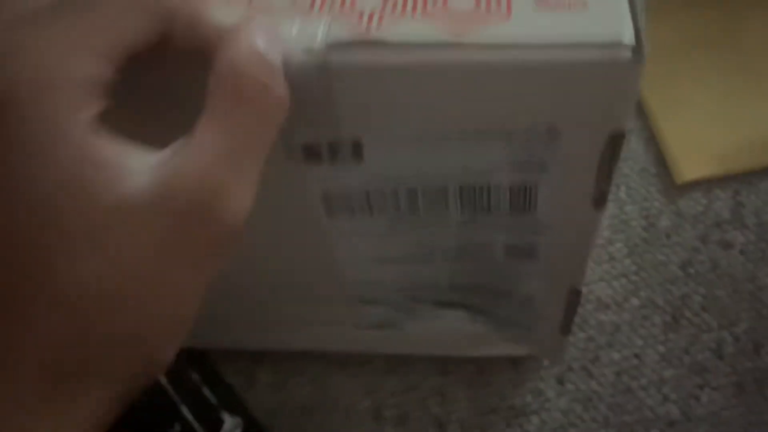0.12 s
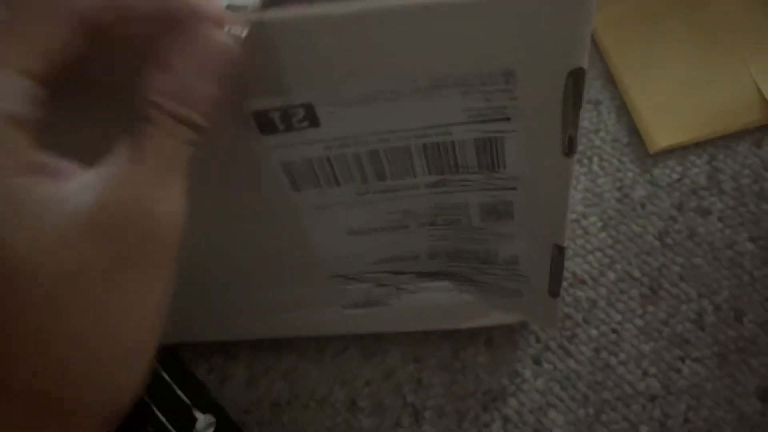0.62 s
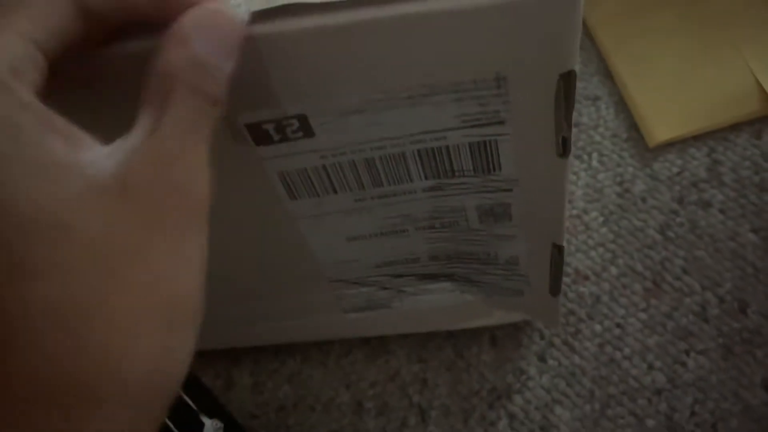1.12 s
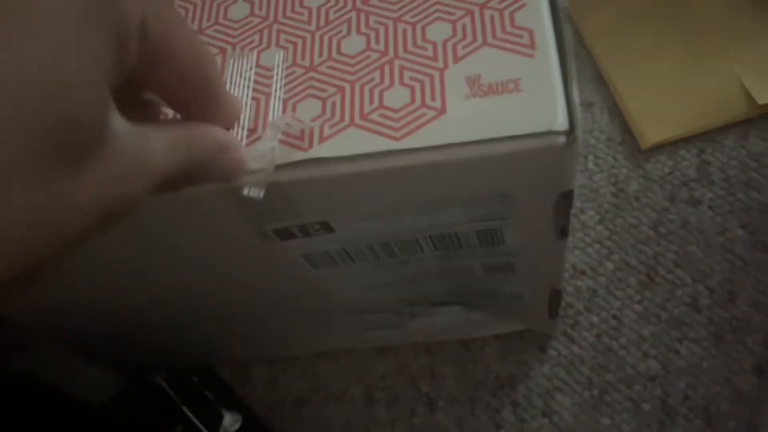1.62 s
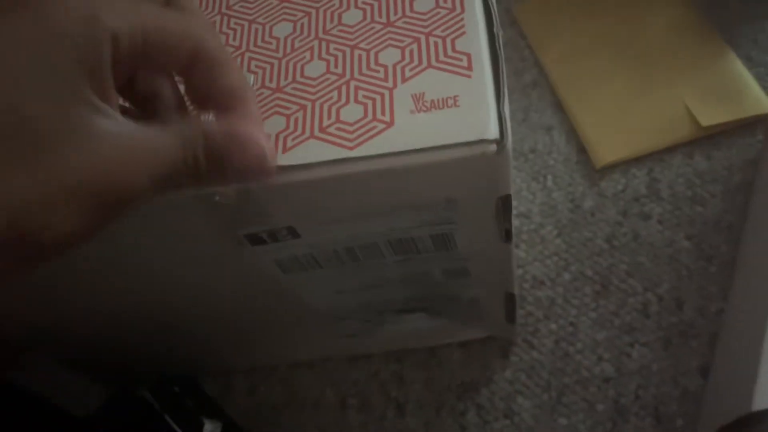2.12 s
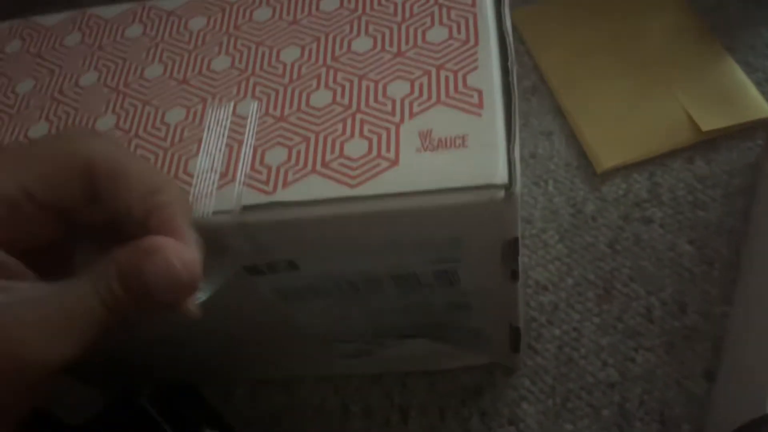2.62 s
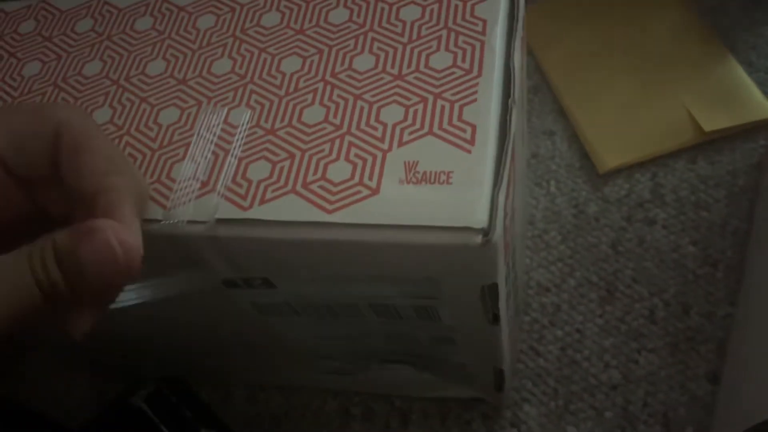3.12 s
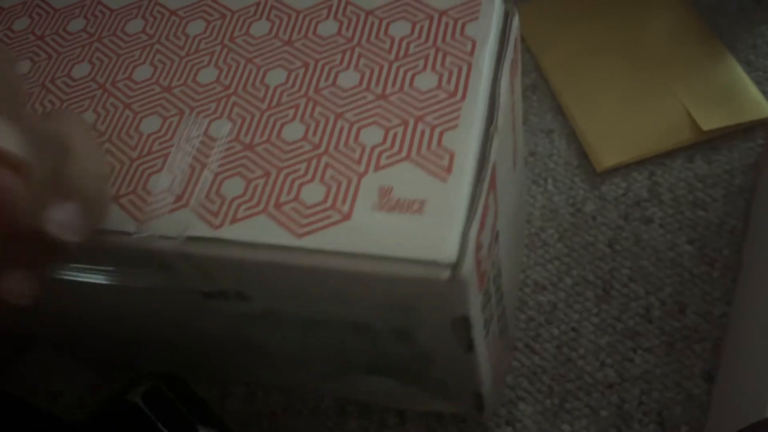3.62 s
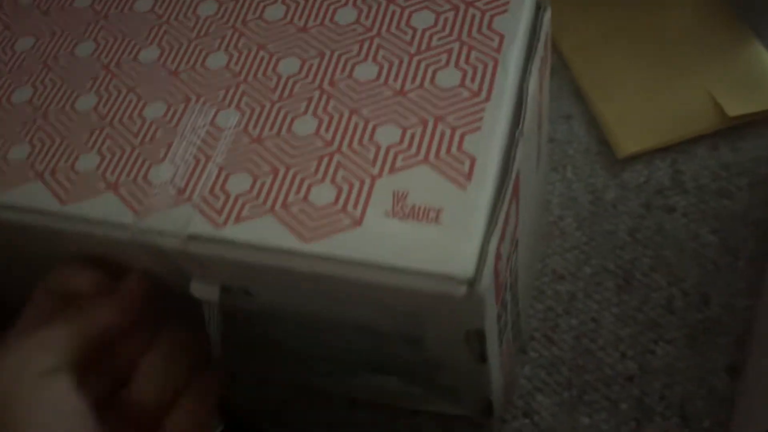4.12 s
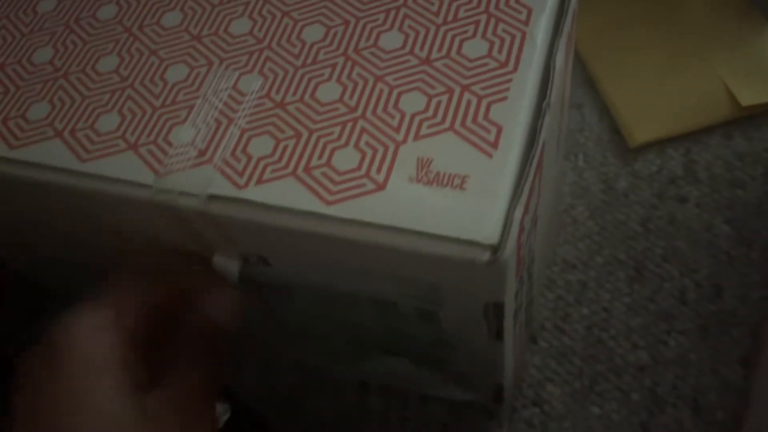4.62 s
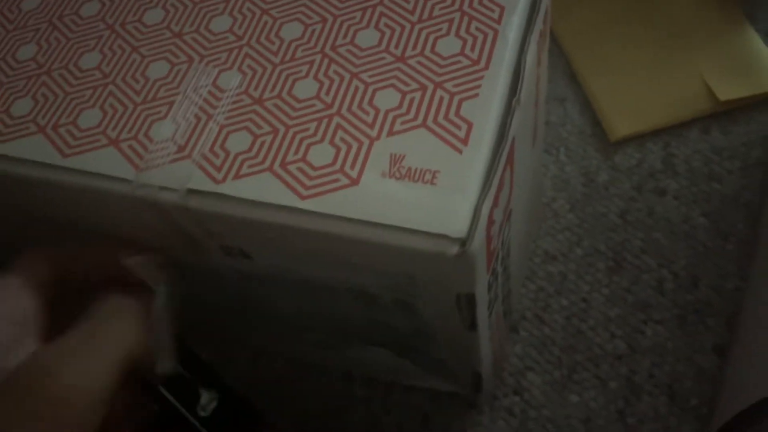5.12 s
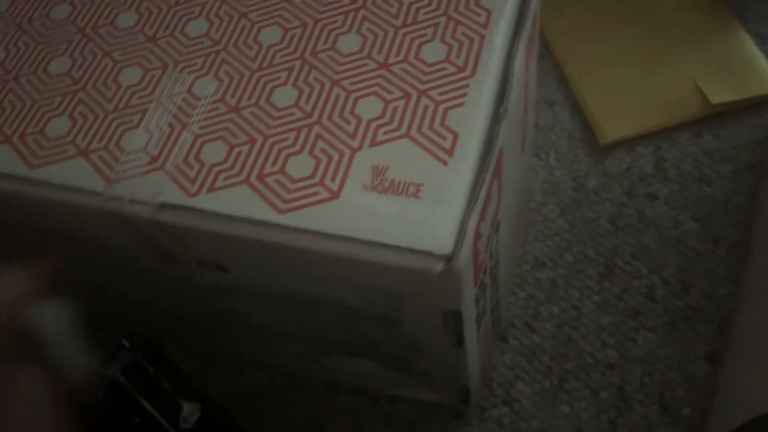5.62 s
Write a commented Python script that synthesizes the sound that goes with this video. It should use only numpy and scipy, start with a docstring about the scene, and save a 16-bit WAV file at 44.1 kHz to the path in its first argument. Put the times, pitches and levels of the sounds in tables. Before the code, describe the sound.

Fingers handle a hollow cardboard box on carpet, very close. It opens with a dull push and thump, then light taps, two stronger hollow knocks, and sharp tape snaps from two seconds. Around four seconds a loud scraping, ripping jolt runs into rapid crackling clicks, then one last bump before it quiets. Small dry carpeted room, close stereo microphone, box slightly left.

```python
"""Hollow knocks and sharp tape snaps: hands shift a cardboard box on a carpet and pick at its packing tape.
Knocks ring decaying panel modes; snaps are bursts of random-sign noise with one crack inside.
Dense noise grains, shaped by each gesture, make the box creak and skin, nail and tape rub; sparse ticks join.
A short soft room tail and still air lie behind it, all heard close up through a two-port microphone."""
import sys
import numpy as np
from scipy import signal
from scipy.fft import rfft, irfft, next_fast_len
from scipy.io import wavfile
from scipy.ndimage import uniform_filter1d, map_coordinates

SR = 44100
rng = np.random.default_rng(int(sys.argv[2]) if len(sys.argv) > 2 else 0)


def master(y):
    """Save y as 16-bit WAV."""
    cut = np.clip(np.atleast_2d(y).T, -1, 1)
    pcm = np.round(cut * 32767)  # scale
    wavfile.write(sys.argv[1], SR, pcm.astype(np.int16))


def undo_db(level):
    """Turn decibels back into plain size, where 20 dB means ten times bigger."""
    steps = np.asarray(level, float) / 20
    return 10 ** steps


N = 252693  # length in samples

# still room tone, overall level set apart: pitch_hz, level_db
AIR_COLOUR = [(18, -19), (30, 20.5), (223, -4), (849, -13), (7170, -27), (9040, -36.5), (14000, -74.5)]
# ringing box panels and the air inside: pitch_hz, level_db, t60_s
BOX_MODES = [(51, -13, 0.26), (90.5, 7, 0.061), (127, -5.5, 0.12), (150.6, -1.5, 0.04), (183, 2.5, 0.056),
             (237, -0.5, 0.059), (278.3, 2, 0.036), (329, -5.5, 0.035), (368.3, -3.5, 0.018),
             (401, 1.5, 0.017), (552, 5.5, 0.018), (731, -3.5, 0.017), (806, 5.5, 0.011), (915, 0.5, 0.013),
             (1273, -6.5, 0.015), (1370, -15.5, 0.005), (1774, -9.5, 0.0064), (2425, -9.5, 0.0053)]
# the box is pushed or squeezed: start_s (moment of the peak), peak_db, swell_s and fade_s (per 20 dB),
# creak_db (creaking hiss over the drag)
SHIFTS = [(0.0, -19.5, .01, 0.096, -11), (0.07, -34.5, 0.25, 0.054, -4.5), (0.16, -39, 0.11, 0.13, -6),
          (0.35, -47, 0.038, 0.33, -15), (0.56, -67, 1, 0.057, 4.5), (0.855, -46, 0.056, 0.33, -14.5),
          (1.26, -35, 0.05, 0.16, -14.5), (1.518, -33, 0.13, 0.079, -10), (1.69, -31.5, 0.026, 0.11, -16),
          (1.891, -49.5, 0.071, 0.037, -2), (2.118, -57, 0.32, 0.24, -1), (2.342, -45, 0.15, 0.11, -5.5),
          (2.517, -42, 0.084, 0.4, -10), (2.972, -56, 0.3, 0.75, -3.5), (3.15, -74, .3, 0.19, 4),
          (3.5, -48, 0.059, 0.25, -12.5), (3.745, -44, 0.064, 0.06, -3), (3.918, -44.5, 0.62, 0.32, -6),
          (3.976, -27.5, 0.05, 0.056, 6), (4.11, -37, 0.02, 0.12, -8.5), (4.409, -49.5, 0.28, 0.11, -0.5),
          (4.574, -40, 0.075, 0.06, -10.5), (4.82, -24.5, 0.016, 0.021, -9.5),
          (4.868, -42, 0.23, 0.15, -10.5), (5.047, -56, 0.011, 0.13, 2)]
# fingers stroke tape and board: start_s (moment of the peak), peak_db, swell_s and fade_s (per 20 dB),
# sharpness_db (nail over skin)
STROKES = [(0.0, -36, .01, 0.21, -6.5), (0.351, -59, 0.02, 0.25, -4.5), (0.779, -55, 0.0097, 0.1, -10),
           (0.857, -57, 0.061, 0.06, -1.5), (0.945, -65.5, 0.24, 0.27, -1.5), (1.238, -57, 0.02, 0.34, -4),
           (1.46, -50.5, 0.29, 0.27, -5), (1.512, -31, 0.017, 0.02, -6), (1.637, -70.5, 0.021, 0.031, 19),
           (1.69, -54, 0.14, 0.28, -7), (1.894, -55, 0.18, 0.055, -0.5), (1.962, -63.5, 0.0088, 0.88, 3),
           (2.119, -48, 0.025, 0.026, 3.5), (2.202, -61.5, 0.032, 0.27, 4), (2.337, -51.5, 0.035, 0.1, -4),
           (2.472, -44.5, 0.061, 0.089, -4), (2.64, -50.5, 0.12, 0.095, -23), (2.749, -50.5, 0.4, 0.12, -3),
           (2.972, -53, 0.2, 0.11, -3.5), (3.227, -67, 0.0022, 0.24, -2), (3.39, -72.5, 0.02, 0.32, 20.5),
           (3.595, -54, 0.21, 0.092, -10), (3.668, -65.5, 0.056, 0.46, 0), (3.715, -46, 0.033, 0.081, -4),
           (3.918, -49.5, 0.28, 0.46, -3), (3.979, -26, 0.031, 0.052, -6.5),
           (4.106, -67.5, 0.043, 0.033, 28.5), (4.15, -54.5, .2, 0.098, -1), (4.409, -55, 0.72, 0.22, 0.5),
           (4.54, -50.5, 0.021, 0.069, 1.5), (4.792, -61.5, 0.25, 0.058, 4.5),
           (4.823, -48, 0.018, 0.015, 17.5), (4.838, -50, 0.074, 0.11, -5), (4.994, -64, 0.052, 0.032, 6.5),
           (5.043, -52.5, 0.013, 0.087, 0.5), (5.272, -66, 0.083, 0.31, 5), (5.559, -60, 0.034, 0.077, 5),
           (5.706, -56.5, 0.043, 0.029, -1)]
# broad rub of skin: pitch_hz, level_db
SKIN_COLOUR = [(700, -12.5), (1400, -0.5), (2000, 3.5), (3200, -3.5), (6000, -21)]
# nail and tape edge: pitch_hz, level_db
NAIL_COLOUR = [(3300, -22), (4600, -2), (6500, 0), (7500, -14), (10000, -35)]
# low creaking hiss of the rubbed box, strongest near 1.4 kHz and falling steeply above: pitch_hz, level_db
CREAK_COLOUR = [(900, 0), (1450, 8), (1800, -5)]
# fine rustle of the tape: pitch_hz, level_db
RUSTLE_COLOUR = [(5000, -6.5), (7500, 4.5), (11500, -6.5), (12800, -25), (15300, -18), (16500, -53.5)]
# rubbing from other spots, unlike at the two ports: pitch_hz, level_db
ELSEWHERE_COLOUR = [(300, -28), (800, -8), (2000, -5.5), (4000, 3.5), (8500, -7.5)]
# tape lets go: start_s (moment of the crack), level_db, body_db (relative), width_s (scales rise and fall)
SNAPS = [(0.0087, -41, 16, 0.006), (0.223, -56, 11, 0.0011), (0.3455, -35.5, 3.5, 0.0045),
         (0.553, -56.5, 9, 0.0084), (0.78, -37.5, 0.5, 0.00077), (0.952, -37, -3.5, 0.0042),
         (1.2672, -29.5, 0, 0.004), (1.358, -51, 6, 0.0044), (1.5133, -48, 4, 0.0028),
         (1.521, -46, -14, 0.002), (1.646, -31.5, -4.5, 0.012), (1.674, -45, 9, 0.0023),
         (1.682, -40.5, 6.5, 0.01), (1.7838, -54, 20, 0.00042), (2.005, -26, -2, 0.007),
         (2.016, -43.5, 11.5, 0.001), (2.0847, -31.5, -1, 0.011), (2.11, -17.5, -12, 0.0044),
         (2.2043, -34, -17, 0.0036), (2.2199, -24.5, -8, 0.0093), (2.317, -21, -10.5, 0.0015),
         (2.322, -31.5, 3, 0.0095), (2.3313, -27.5, -1.5, 0.0029), (2.4453, -21, 7, 0.0044),
         (2.4494, -3.5, -1.5, 0.0034), (2.5651, -26, -1, 0.007), (2.6396, -54, 10, 0.0045),
         (2.689, -25, -2.5, 0.0025), (2.7241, -30, -0.5, 0.0028), (2.745, -33.5, -0.5, 0.0054),
         (2.826, -36, -22, 0.00055), (2.8515, -28, -12.5, 0.0015), (2.8657, -25, -26, 0.00042),
         (2.885, -31.5, -7, 0.0029), (2.904, -30.5, -9, 0.0099), (2.9161, -24, -22, 0.0069),
         (2.959, -26, -8.5, 0.0017), (2.9667, -30, -10, 0.0042), (3.001, -51, 19.5, 0.0058),
         (3.218, -37.5, -60, 0.00085), (3.4737, -36, -5, 0.0031), (3.8649, -31, 2, 0.0074),
         (3.92, -31.5, -6.5, 0.0048), (3.9424, -31, -0.5, 0.029), (3.9615, -18.5, -4, 0.00092),
         (3.9683, -7.5, -2.5, 0.0031), (3.9776, -13.5, -6.5, 0.0011), (3.9865, -11.5, -9, 0.0049),
         (4, -19.5, -7, 0.036), (4.006, -7, -4, 0.0025), (4.165, -11.5, -5.5, 0.0014),
         (4.23, -15.5, -4, 0.0045), (4.2456, -33, -7, 0.0044), (4.2511, -12.5, -12, 0.0028),
         (4.266, -6.5, -27, 0.00098), (4.278, -19.5, -10.5, 0.0013), (4.283, -3, -28, 0.0027),
         (4.309, -34, -13, 0.0046), (4.3185, -5.5, -16, 0.0017), (4.336, -24.5, -13, 0.0023),
         (4.3566, -35.5, 2.5, 0.0092), (4.37, -13, -8, 0.006), (4.3789, -13, -8, 0.000895),
         (4.392, -16.5, -10.5, 0.0067), (4.5407, -28.5, -21, 0.0047), (4.5482, -21, -11, 0.0035),
         (4.6029, -33, -13, 0.0071), (4.697, -33.5, -7.5, 0.0041), (4.7596, -32.5, -7, 0.0028),
         (4.7999, -16.5, -8, 0.0061), (4.8088, -11, 2.5, 0.0053), (4.8214, -17, 1, 0.0073),
         (5.0979, -35, 5.5, 0.0011), (5.334, -29.5, -13.5, 0.01)]
# body of a snap: pitch_hz, level_db
SNAP_BODY_COLOUR = [(600, -28), (1500, -7), (3000, -4), (4000, -0.5), (5000, -1.5), (6500, 2),
                    (10000, -51.5)]
# bright top of a snap: pitch_hz, level_db
SNAP_TOP_COLOUR = [(3600, -16), (4900, 10), (6400, -12), (8200, 0), (11500, 1), (13500, -5), (15200, -11),
                   (17000, -34.5)]
# fingers and carpet knock the box: start_s, peak_db, panel_hz (panel struck), hardness_db (before an offset)
KNOCKS = [(0.006, -20.5, 79, -41), (0.199, -28.5, 75.5, -23), (0.335, -35, 178, -15),
          (0.474, -37.5, 280, 4), (0.785, -32, 73.4, -17.5), (1.199, -40.5, 302, 34),
          (1.228, -32, 257, -30), (1.27, -26.5, 219, -26), (1.354, -24, 224, 8), (1.424, -32, 233, 6),
          (1.509, -16, 225, 4.5), (1.618, -28.5, 208, -7), (1.674, -11.5, 177, 0), (2.006, -39, 203, -25),
          (2.08, -33, 212, 47), (2.109, -27, 300, 13), (2.449, -15.5, 361.6, -16), (2.565, -11.5, 282, -3),
          (2.619, -21.5, 343, -9), (2.64, -25, 139, 0), (2.849, -31, 280, -4), (2.955, -27.5, 105, -9),
          (3.063, -37, 183, -17), (3.3815, -37.5, 227, -28), (3.477, -35.5, 256, -18),
          (3.523, -39.5, 304, 1), (3.586, -24, 293, -2.5), (3.779, -38, 320, -20), (3.86, -20, 298, -9),
          (3.965, -16.5, 237, 8), (3.978, -13, 383, -11), (3.997, -13, 504, -17), (4.006, -16.5, 226, 7),
          (4.124, -43, 101, -9), (4.55, -25, 273, 2.5), (4.694, -41, 174, -27), (4.805, -18.5, 126, 6.5),
          (4.888, -28.5, 167, 3), (5.1, -25.5, 350, -13)]
# the case shades the right port: pitch_hz, level_db
RIGHT_SHADE = [(60, -1.5), (400, -2.5), (800, -5), (1500, .5), (2800, 1), (4500, -5), (7800, -6), (9000, 0),
               (12500, 0), (14000, -7), (15200, 0)]
# both ports ring near 10 kHz: pitch_hz, level_db
PORT_COLOUR = [(25, -12), (55, 0.5), (8000, -2), (8800, 6), (9700, 13), (10600, 8), (12000, 3), (13500, -7),
               (15300, 7), (16200, -10.5), (17000, -27)]


def colour(x, points, lag_s=0.):
    """Causal minimum-phase filter through (Hz, dB) points, with an optional delay."""
    hz, db = np.transpose(points)
    grid_hz = np.linspace(1, SR / 2, 1025)
    level_db = np.interp(np.log(grid_hz), np.log(hz), db)
    # folding the cepstrum onto positive time makes the filter causal
    cepstrum = irfft(np.log(undo_db(level_db)))
    cepstrum[1:1024] *= 2
    cepstrum[1025:] = 0
    size = next_fast_len(x.shape[-1] + 4096)
    gain = rfft(irfft(np.exp(rfft(cepstrum))), size)
    delay = np.exp(-2j * np.pi * np.arange(len(gain)) * SR / size * lag_s)
    return irfft(rfft(x, size) * gain * delay, size)[..., :x.shape[-1]]


def unit(x):
    """Scale to rms 1."""
    return x / np.sqrt(np.mean(x ** 2))


def add(track, s, sound):
    """Mix a short sound into the track at a time in seconds."""
    i = int(max(s, 0) * SR)
    track[i:i + len(sound)] += sound[:N - i]


def walk(rate):
    """Random levels drawn rate times a second and slewed from one to the next; spread near 1."""
    k = int(SR / rate)
    held = np.repeat(rng.standard_normal(N // k + 1), k)
    return uniform_filter1d(held, k)[:N]


def air(level_db=-68, side_db=-6):
    """Still room tone: coloured noise, partly shared by both ports."""
    mid, side = colour(rng.standard_normal((2, N)), AIR_COLOUR)
    ports = mid + undo_db(side_db) * side * np.array([[1], [-1]])
    return undo_db(level_db) * unit(ports)


def room(x, t60=0.049, wet_db=-15, low_hz=450, damp_hz=2600):
    """Carpeted room: a short, dull noise tail, a different one to each side."""
    t = np.arange(int(.3 * SR)) / SR
    decay = np.exp(-np.log(1000) * t / t60)
    tail = rng.standard_normal((2, len(t))) * decay * (t > .002)
    tail = signal.lfilter(*signal.butter(2, [low_hz, damp_hz], "bandpass", fs=SR), tail)
    tail /= np.sqrt((tail ** 2).sum(axis=1, keepdims=True))
    return undo_db(wet_db) * signal.fftconvolve(x[None], tail, axes=1)[:, :N]


def effort(table, *extra_db):
    """Gestures swell to a peak and fade; overlapping ones add in power. One gain curve per extra level."""
    s, db, swell, fade = np.transpose(table)[:4, :, None]
    t = np.arange(0, N + 64, 64) / SR
    shape_db = db + 20 * np.where(t < s, (t - s) / np.abs(swell), (s - t) / np.abs(fade))
    curves = []
    for extra in extra_db:
        gesture = undo_db(shape_db + np.reshape(extra, (-1, 1)))
        total = np.sqrt((gesture ** 2).sum(axis=0))
        curves.append(np.interp(np.arange(N) / SR, t, total))
    return curves


def grains(spread_db):
    """Friction as dense tiny slips: noise whose sizes have a long tail."""
    return rng.standard_normal(N) * undo_db(spread_db * np.minimum(rng.exponential(size=N), 7))


def modes(swell=3.2, sag=0., sag_s=0.0036):
    """Box modes ringing out, one per row: each builds over some cycles and can start sharp, then sag.

    swell is the build-up time constant in cycles at 400 Hz; sag is the starting rise in pitch as a fraction."""
    t = np.arange(int(.2 * SR)) / SR
    hz, db, t60 = np.array(BOX_MODES).T[:, :, None]
    pitch_rise = sag * np.minimum(250 / hz, 1) ** 2  # whole up to 250 Hz, less above
    bent_t = t + pitch_rise * sag_s * (1 - np.exp(-t / sag_s))
    build = 1 - np.exp(-t * hz * np.sqrt(hz / 400) / swell)
    decay = np.exp(-np.log(1000) * t / t60)
    return undo_db(db) * np.sin(2 * np.pi * hz * bent_t) * decay * build


def ticks(per_s=220, tick_db=14, spread_db=5):
    """Tiny random cracks of tape and board, as strong as the stroke that causes them."""
    sizes = undo_db(spread_db * np.minimum(rng.exponential(size=N), 2))
    hits = (rng.random(N) < per_s / SR) * rng.standard_normal(N) * sizes
    return undo_db(tick_db) * effort(STROKES, 0)[0] * colour(hits, SNAP_BODY_COLOUR)


def rubbing(flicker_db=4.5, lurch_db=3, crackle_db=3, rustle_db=1, rustle_per_sharp=1.72, sharpest_db=1):
    """Uneven friction: drag shakes the big panels and the box creaks; finer slips scrape and rustle."""
    drag, creak = effort(SHIFTS, 0, np.array(SHIFTS)[:, -1])
    sharp_db = np.array(STROKES)[:, -1]
    # a sharper touch crinkles the tape more, up to a limit
    crinkle_db = rustle_db + rustle_per_sharp * np.minimum(sharp_db, sharpest_db)
    scrape, scratch, rustle = effort(STROKES, 0, sharp_db, crinkle_db)

    ring, big = modes(), np.array(BOX_MODES)[:, 0] < 400
    big_panels, small_panels = (
        unit(signal.fftconvolve(grains(4.26), ring[k].sum(axis=0))[:N]) for k in (big, ~big))
    skin, nail = (unit(colour(grains(3.8), c)) for c in (SKIN_COLOUR, NAIL_COLOUR))
    creak_hiss = unit(colour(small_panels, CREAK_COLOUR))
    tape = unit(colour(grains(4.14), RUSTLE_COLOUR))

    grip = undo_db(flicker_db * walk(43))
    lurch = undo_db(lurch_db * walk(25))
    crackle = undo_db(crackle_db * walk(120))
    fine = creak * creak_hiss + scrape * skin + scratch * nail + rustle * crackle * tape
    return drag * lurch * big_panels + grip * fine


def snaps(rise=0.24, fall=0.29, tail_db=-30, tail_s=0.052, crack_db=8, top_db=-10, body_db=-3, ring_db=-12):
    """Tape letting go: one crack in a peel-long burst, a faint tail; its body also tugs the small panels.

    rise and fall are time constants as fractions of the width; tail_s is a t60."""
    out = np.zeros(N)
    lead_s = .01  # room for the burst to grow ahead of the crack
    t = np.arange(int(.07 * SR)) / SR - lead_s
    click = np.arange(256) == 0
    top, body = colour(click, SNAP_TOP_COLOUR), colour(click, SNAP_BODY_COLOUR)
    ring = modes()[np.array(BOX_MODES)[:, 0] > 260].sum(axis=0)[:2048]
    tail = undo_db(tail_db) * (t > 0) * np.exp(-np.log(1000) * np.abs(t) / tail_s)
    signs = np.sign(rng.standard_normal((len(SNAPS), len(t))))
    for (s, db, rel_db, width), sign in zip(SNAPS, signs):
        shape = np.exp(np.where(t < 0, t / rise, -t / fall) / max(width, .0005))
        burst = sign * (shape + tail)
        burst[int(lead_s * SR)] = undo_db(crack_db)
        for part, part_db in ((top, top_db), (body, rel_db + body_db), (ring, rel_db + ring_db)):
            sound = signal.fftconvolve(burst, part)
            loudest = np.sqrt(uniform_filter1d(sound ** 2, size=44).max())  # rms over 1 ms
            add(out, s - lead_s, undo_db(db + part_db) * sound / loudest)
    return out


def knocks(focus_db=18, reach=0.52, scatter_db=3, hard_db=10, swell=1.35, sag=0.48):
    """A push rings every mode, loudest near the struck panel; a hard touch wakes the high ones."""
    out, ring, hz = np.zeros(N), modes(swell, sag), np.array(BOX_MODES)[:, 0]
    chance = rng.standard_normal((len(KNOCKS), len(BOX_MODES)))
    for (s, db, panel_hz, rel_db), scatter in zip(KNOCKS, chance):
        near = np.exp(-(np.log(hz / panel_hz) / reach) ** 2)
        high = np.clip(np.log2(hz / 350), 0, 1)
        push = undo_db(focus_db * near + (rel_db + hard_db) * high + scatter_db * scatter)
        sense = (-1) ** np.cumsum(hz > panel_hz)  # modes above the struck panel alternate in sign
        blow = push * sense @ ring
        add(out, s, undo_db(db) * blow / np.abs(blow).max())
    return out


def scene(wander_rate=6, wander_s=.000004, port_lag_s=0.0002527):
    """The box sits left: it reaches the right port later and shaded; the moving hands shift that lag."""
    box = knocks() + snaps() + rubbing() + ticks()
    reach = np.arange(N) + wander_s * SR * walk(wander_rate)
    right = colour(map_coordinates(box, [reach], order=3), RIGHT_SHADE, port_lag_s)
    elsewhere = colour(np.array([rubbing(), rubbing()]), ELSEWHERE_COLOUR)
    return np.array([box, right]) + elsewhere + room(box) + air()


def top_cut(x):
    """Nothing passes above the cut-off."""
    return signal.sosfilt(signal.butter(12, 17140, fs=SR, output="sos"), x)


def record(dry):
    """The ports colour the sound and the loudest peaks are softly rounded."""
    mix = np.tanh(colour(dry, PORT_COLOUR))
    return top_cut(mix)


dry = scene()
out = record(dry)
master(out)
```